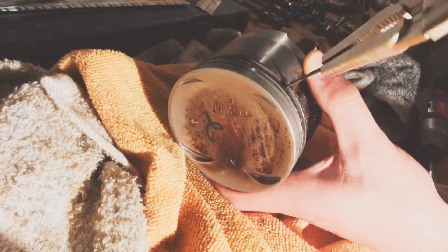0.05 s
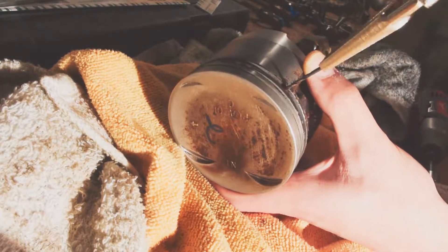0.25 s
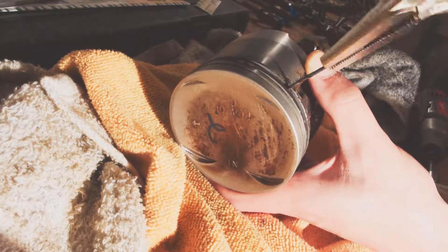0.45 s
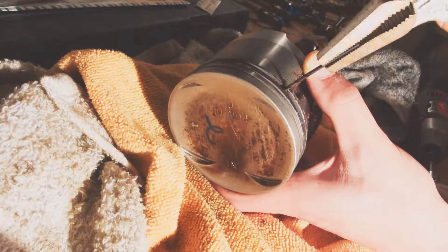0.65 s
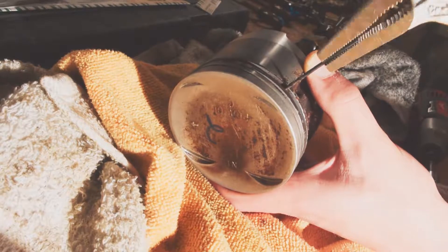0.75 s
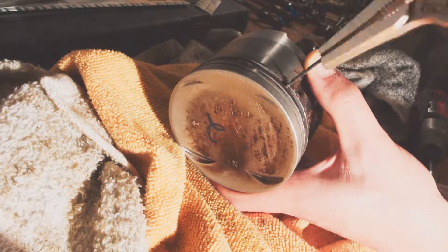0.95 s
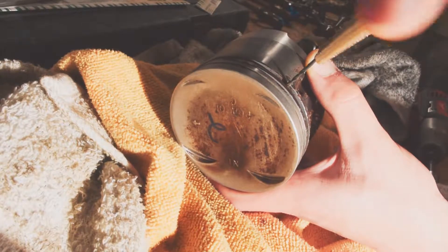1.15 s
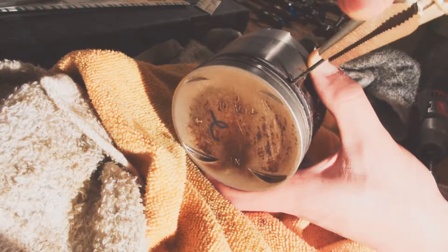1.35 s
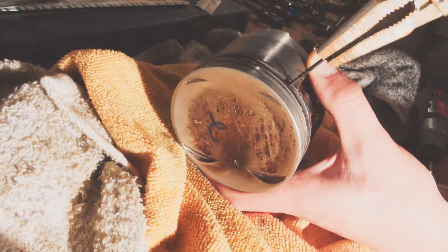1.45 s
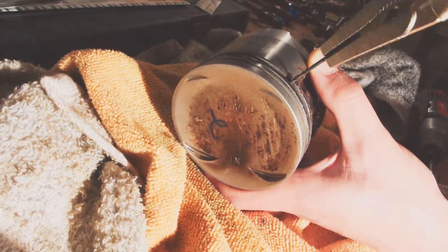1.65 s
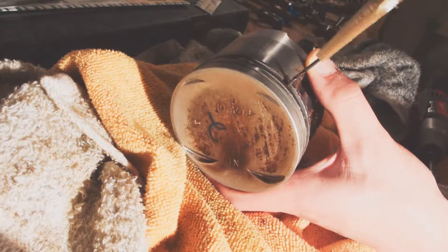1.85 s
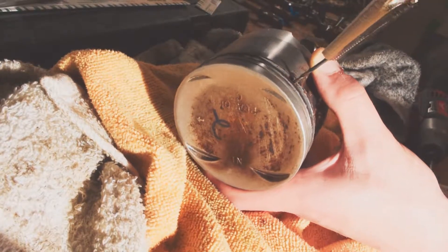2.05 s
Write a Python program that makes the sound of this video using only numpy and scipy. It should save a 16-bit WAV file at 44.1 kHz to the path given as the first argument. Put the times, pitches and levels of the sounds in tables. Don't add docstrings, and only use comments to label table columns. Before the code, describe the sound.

A drill bit twisted in a piston's small hole scrapes faintly, ticks, then snaps loudly and brightly at 0.12 seconds, leaving a thin metallic shiver until about 0.45. Near quiet follows. Scrapes from 0.92 lead to light ticks at 1.08, then a tight clicking burst at 1.32. Soft rubbing and rising grit precede two dry snaps at 1.83-1.84. Low hum, hiss, faint workshop tail.

```python
import sys
import numpy as np
from scipy import signal
from scipy.fft import rfft, irfft
from scipy.io import wavfile
from scipy.ndimage import uniform_filter1d

SR = 44100
rng = np.random.default_rng(int(sys.argv[2]) if len(sys.argv) > 2 else 0)


def unload_wav(signal):
    wavfile.write(
        sys.argv[1],
        SR,
        np.round(np.clip(np.atleast_2d(signal).T, -1, 1) * 32767).astype(np.int16),
    )


def gain_from_db(level_db):
    decades = np.asarray(level_db, float) / 20
    return 10 ** decades


N = 92610

# frequency in Hz, level in dB, t60 in seconds.
LOOSE_MODES = [(950, -5, .006), (1150, -10, .02), (2670, -10, .1), (3590, -13, .03), (4450, -20, .04),
               (5100, -16, .025), (6380, -1, .019), (6660, -1, .012), (7400, -13, .005), (8020, -7, .018),
               (9600, -9, .012), (10720, -2, .005), (12340, -6, .04), (14200, 2, .008)]
SHIVER_MODES = [(1130, -16, .25), (3590, -9, .09), (3900, -13, .1), (4490, -2, .045), (5010, -5, .06),
                (6330, -2, .05), (6520, 0, .05), (6830, -2, .05), (8060, -7, .04), (8230, -10, .06)]
HALF_IN_MODES = [(1650, -9, .025), (2670, -14, .05), (3150, 0, .022), (3620, -2, .016), (3950, -3, .014),
                 (4450, -4, .013), (5100, -4, .012), (7040, -2, .016), (7350, -3, .015), (7770, -3, .015),
                 (8750, -8, .012), (9600, -6, .008)]
SEATED_MODES = [(770, -9, .022), (980, -7, .018), (2670, -13, .09), (3250, -8, .015), (3610, -6, .025),
                (4680, 2, .032), (4890, -6, .025), (5800, -13, .015), (6770, -7, .02), (7110, -3, .02),
                (7400, -6, .015), (7780, -2, .028), (9170, -11, .014), (11000, -22, .008)]
DEEP_MODES = [(1644, 1.5, 0.032), (2680, -6.5, 0.055), (3400, 2.5, 0.013), (3925, 9.5, 0.0078),
              (4016, 12, 0.011), (4100, -18, 0.0064), (4804, 2, 0.023), (5420, 2, 0.019), (6020, 0, 0.014),
              (7000, -2.5, 0.018), (7870, -5, 0.033), (8740, 0, 0.016), (9930, -5, 0.014)]
KNOCK_MODES = [(3400, -3, .003), (4600, 0, .003), (5900, -2, .003)]
THUD_MODES = [(450, -4, .008), (900, -4, .005), (1500, -1, .004), (2200, 0, .004)]

# start in seconds, peak level in dB, favoured frequency in Hz, chatter in seconds.
HALF_IN_SNAPS = [(.1125, -26, 4000, .001), (.1148, -23, 4300, .0005), (.1155, -31, 1650, .001),
                 (.1160, -27, 4300, .001), (.1170, -24, 3500, .0006), (.1176, -25, 4400, .001),
                 (.1212, -30, 3500, .001), (.1262, -26, 3600, .001), (1.0735, -36, 3900, .002),
                 (1.077, -36, 3300, .001), (1.0786, -34, 3600, .001), (1.0812, -39, 4200, .002),
                 (1.084, -36, 4200, .002), (1.088, -28, 5000, .002), (1.0882, -33, 1650, .0005),
                 (1.0884, -33, 10500, .001), (1.0922, -24, 3200, .001), (1.0922, -23, 7400, .001),
                 (1.0937, -30, 7700, .001), (1.0961, -29, 7400, .001), (1.0995, -39, 7100, .002),
                 (1.174, -47, 1900, .001)]
LOOSE_SNAPS = [
    (.1231, -1, 6400, .0001),
    (.12373, -9, 6500, .0001),
]
SHIVER_SNAPS = [
    (0.1276, -32, 4800, 0.0016),
    (.4314, -46, 6500, .004),
]
SEATED_SNAPS = [(1.2043, -31.5, 3900, .005), (1.2175, -30.5, 4250, 0.0068), (1.2242, -33.5, 4970, 0.0029),
                (1.238, -33, 4830, .002), (1.2632, -31, 5350, .005), (1.2715, -33, 4660, 0.005),
                (1.281, -27, 6000, 0.0041), (1.3209, -16, 6000, .0002), (1.3212, -11, 7100, .0003),
                (1.3226, -14, 4800, .0006), (1.3238, -18, 4700, .0005), (1.3236, -35, 900, .0003),
                (1.3273, -14, 6500, .0004), (1.3276, -13.5, 4700, .0005), (1.3285, -42, 850, .0003),
                (1.3299, -14.5, 6000, .0005)]
DEEP_SNAPS = [
    (1.8198, -35, 3000, .001),
    (1.8268, -24, 4050, .0003),
    (1.8272, -15.5, 3900, .0003),
    (1.8275, -28, 8700, .001),
    (1.8299, -25, 4000, .0005),
    (1.8308, -24, 4500, .001),
    (1.8425, -23, 8500, .0001),
    (1.8444, -15.5, 4800, .0004),
    (1.8470, -23, 3500, .002),
    (1.8488, -31, 4700, .002),
]
KNOCKS = [
    (1.0923, -24, 4600, .0001),
    (1.8425, -10, 4600, .0001),
]
THUDS = [
    (.1231, -29, 1500, .0003),
    (1.0882, -43, 1000, .001),
    (1.3222, -35, 1500, .003),
    (1.3236, -39, 500, .001),
    (1.8272, -44, 1200, .001),
    (1.8444, -41, 1000, .002),
]

# start, rise and fall in seconds, rms level in dB, favoured frequency in Hz.
HALF_IN_DRAGS = [
    (0, 0.0028, 0.31, -63, 4900),
    (0.059, 0.087, 0.0061, -52, 4050),
    (0.997, 0.018, 0.025, -61.5, 4630),
]
SHIVER_DRAGS = [
    (0.17, 0.026, 0.28, -56, 5100),
    (0.18, 0.047, 0.032, -60.5, 1130),
    (0.14, 0.02, 0.15, -51.5, 5500),
    (.34, 0.071, 0.045, -56.5, 6800),
]
LOOSE_DRAGS = [
    (0.576, 0.02, 0.016, -66, 4440),
]
SEATED_DRAGS = [
    (0.924, 0.048, 0.017, -53.5, 5600),
    (1.2, 0.039, 0.061, -52, 4280),
    (1.255, 0.041, 0.017, -53.5, 6360),
    (1.33, 0.014, 0.05, -62, 7160),
]
DEEP_DRAGS = [
    (1.725, 0.02, 0.12, -56, 3360),
    (1.73, 0.028, 0.054, -55, 7000),
    (1.781, 0.0456, 0.014, -46, 5500),
    (1.828, 0.0038, 0.01, -41, 4260),
    (1.851, 0.0089, .08, -63, 4860),
]

# start, rise and fall in seconds, rms level in dB, centre in Hz.
SHUFFLES = [
    (0, 0.02, 0.08, -52.5, 120),
    (0, 0.027, 0.028, -58, 320),
    (1.68, 0.12, 0.088, -54, 330),
    (1.6, 0.0034, 0.011, -52, 490),
]

# frequency in Hz, density in dB per Hz.
AIR_SPECTRUM = [(18, -76), (30, -14), (60, -13.5), (118, -17.5), (146, -10.5), (443, -15.5), (1700, -21.5),
                (15200, -26.5), (16500, -42)]
# frequency in Hz, side minus mid in dB.
AIR_SIDE = [(60, -13.5), (110, -11), (200, -15.5), (380, -13), (700, -10.5), (1290, -10.5), (2380, -8.5),
            (4400, -6), (8120, -7), (15000, -5)]
# frequency in Hz, wander in Hz, rms level in dB.
HUM = [
    (58.4, 2.44, -60.5),
    (115.2, 7.1, -64.5),
]
# time in seconds, gain in dB.
HUM_SWELL = [(0, 5.5), (.2, -9), (.4, 0), (.58, 4.5), (.7, -3), (.8, 0.5), (1.0, -1.5), (1.6, -6),
             (2.1, -0.5)]


def unit(x):
    return x / np.sqrt(np.mean(x ** 2) + 1e-18)


def on_log(table, hz):
    table = np.array(table, float)
    return np.interp(np.log(np.maximum(hz, 1)), np.log(table[:, 0]), table[:, 1])


def walk(rate_hz):
    k = int(SR / rate_hz)
    return unit(uniform_filter1d(uniform_filter1d(rng.standard_normal(N), k), k))


def broad(x, hz):
    band = [hz / 2.04, min(hz * 1.68, SR / 2.5)]
    return signal.sosfilt(signal.butter(2, band, "bandpass", fs=SR, output="sos"), x)


def add(out, start_s, x):
    i = max(int(start_s * SR), 0)
    out[i:i + len(x)] += x[:N - i]


def ring(modes, favour_hz, damping=1):
    favour_octaves, floor_db, node_hz = .45, -16, 1000
    detune, contact_s = .002, .00008
    t = np.arange(SR // 6)[:, None] / SR
    hz, db, t60 = np.array(modes, float).T
    chance = rng.standard_normal((2, len(hz)))
    favour = np.exp(-.5 * (np.log2(hz / favour_hz) / favour_octaves) ** 2) + gain_from_db(floor_db)
    sign = (-1) ** (hz // node_hz)
    gain = gain_from_db(db) * favour * gain_from_db(chance[0]) * sign
    decay = np.exp(-np.log(1000) * t / np.maximum(t60 * damping, 1e-3))
    wave = np.sin(2 * np.pi * hz * (1 + detune * chance[1]) * t)
    onset = 1 - np.exp(-t / contact_s)
    return (gain * decay * wave * onset).sum(axis=1)


def grit(size, per_s):
    spread_db = 4.5
    chance = rng.random((3, size))
    strikes = chance[0] < per_s / SR
    strength = gain_from_db(-spread_db * np.log(np.maximum(chance[1], .01)))
    return strikes * strength * np.sign(chance[2] - .5)


def drags(rows, modes, hiss_db):
    grit_per_s, drag_damping, hiss_hz = 9500, .35, 5200
    out = np.zeros(N)
    t = np.arange(SR // 2) / SR
    for start, rise, fall, db, hz in rows:
        pressure = np.interp(t, [0, rise, rise + fall], [0, 1, 0]) ** 1.09
        force = grit(len(t), grit_per_s) * pressure
        body = signal.fftconvolve(force, ring(modes, hz, drag_damping))[:len(t)]
        hiss = broad(force, (hz + hiss_hz) / 2)
        peak = slice(int(rise * SR / 2), int((rise + fall / 2) * SR) + 2)
        body = body / body[peak].std()
        hiss = gain_from_db(hiss_db) * (hz > 2000) * hiss / hiss[peak].std()
        add(out, start, gain_from_db(db) * (body + hiss))
    return out


def shuffles():
    t = np.arange(N) / SR
    out = np.zeros(N)
    for start, rise, fall, db, hz in SHUFFLES:
        rub = unit(broad(rng.standard_normal(N), hz))
        pressure = np.interp(t, [start, start + rise, start + rise + fall], [0, 1, 0])
        out += gain_from_db(db) * rub * pressure
    return out


def mains_hum():
    hum = np.zeros(N)
    for hz, wander_hz, db in HUM:
        flutter = gain_from_db(2.4 * walk(24))
        phase = 2 * np.pi * np.cumsum(hz + wander_hz * walk(9.7)) / SR
        hum += gain_from_db(db) * flutter * np.sqrt(2) * np.sin(phase)
    return hum * gain_from_db(np.interp(np.arange(N) / SR, *np.array(HUM_SWELL).T))


def air():
    air_db = -53.5
    hz = np.arange(N // 2 + 1) * SR / N
    mid, side = rfft(rng.standard_normal((2, N)), axis=1) * gain_from_db(on_log(AIR_SPECTRUM, hz))
    scale = gain_from_db(air_db) / irfft(mid * (hz > 150), N).std()
    side = side * gain_from_db(on_log(AIR_SIDE, hz))
    return np.array([scale * irfft(mid, N) + mains_hum(), scale * irfft(side, N)])


def room(x):
    level_db, side_db, t60_s, delay_s = -22, -40, 0.88, 0.0027
    t = np.arange(SR) / SR
    tail = rng.standard_normal((2, SR)) * np.exp(-np.log(1000) * t / t60_s) * (t > delay_s)
    tail *= gain_from_db(level_db) / np.sqrt((tail[0] ** 2).sum())
    tail *= np.array([[1], [gain_from_db(side_db)]])
    return signal.fftconvolve(tail, x[None], axes=1)[:, :N]


def snaps(rows, modes):
    chatter_per_s, crack_db, crack_s = 3700, -23, .002
    out = np.zeros(N)
    t = np.arange(SR // 30) / SR
    for start, db, hz, chatter_s in rows:
        force = .25 * grit(len(t), chatter_per_s) * np.exp(-t / max(chatter_s, 1e-4))
        force[0] = 1
        body = signal.fftconvolve(force, ring(modes, hz))
        body /= np.abs(body).max()
        crack = broad(rng.standard_normal(len(t)), hz) * np.exp(-t / crack_s)
        body[:len(t)] += gain_from_db(crack_db) * crack
        add(out, start, gain_from_db(db) * body)
    return out


def scene():
    grit_hiss_db, shiver_hiss_db = 4, -35
    stages = [
        (HALF_IN_MODES, HALF_IN_SNAPS, HALF_IN_DRAGS, grit_hiss_db),
        (LOOSE_MODES, LOOSE_SNAPS, LOOSE_DRAGS, grit_hiss_db),
        (SHIVER_MODES, SHIVER_SNAPS, SHIVER_DRAGS, shiver_hiss_db),
        (SEATED_MODES, SEATED_SNAPS, SEATED_DRAGS, grit_hiss_db),
        (DEEP_MODES, DEEP_SNAPS, DEEP_DRAGS, grit_hiss_db),
        (KNOCK_MODES, KNOCKS, [], grit_hiss_db),
        (THUD_MODES, THUDS, [], grit_hiss_db),
    ]
    tool = np.zeros(N)
    for modes, hits, rubs, hiss_db in stages:
        tool += drags(rubs, modes, hiss_db) + snaps(hits, modes)
    mid, side = room(tool) + air()
    mid = mid + tool + shuffles()
    return np.array([mid + side, mid - side])


def top_cut(x):
    return signal.sosfilt(signal.butter(12, 16850, fs=SR, output="sos"), x)


def record(dry):
    top_hz = 16600
    low_pass = signal.ellip(8, .2, 70, top_hz, fs=SR, output="sos")
    mix = signal.sosfilt(low_pass, dry)
    return top_cut(mix)


dry = scene()
out = record(dry)
unload_wav(out)
```